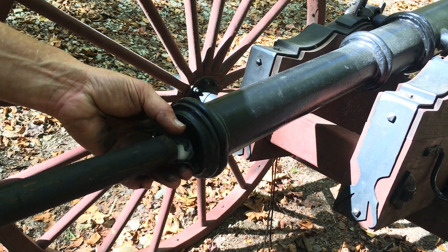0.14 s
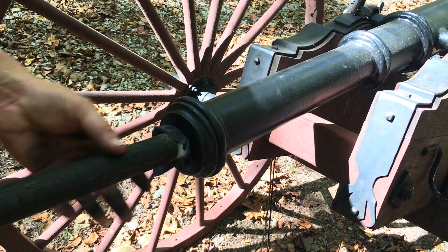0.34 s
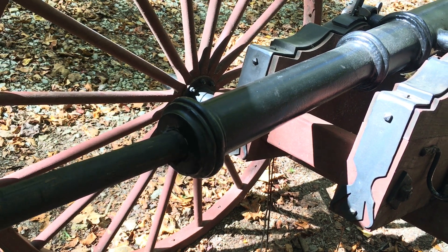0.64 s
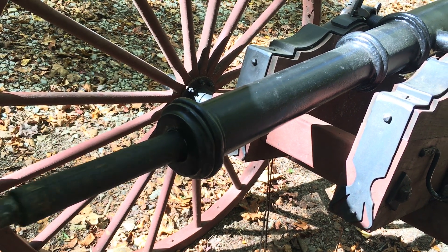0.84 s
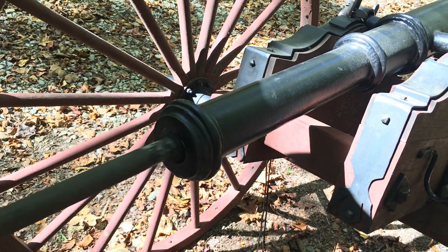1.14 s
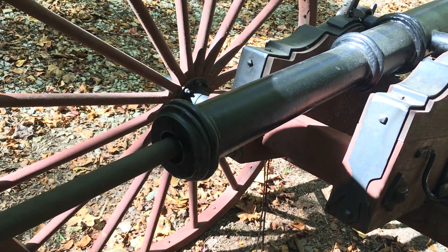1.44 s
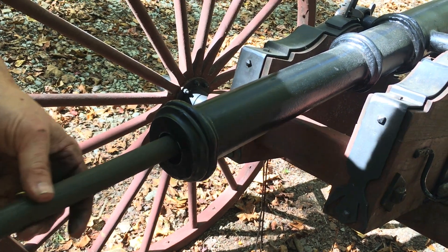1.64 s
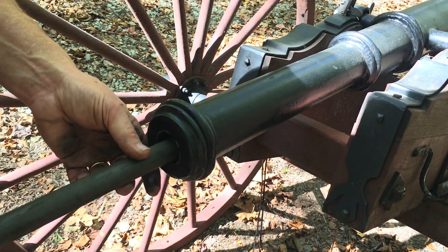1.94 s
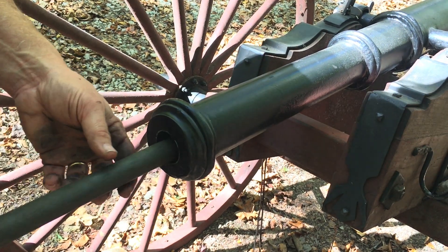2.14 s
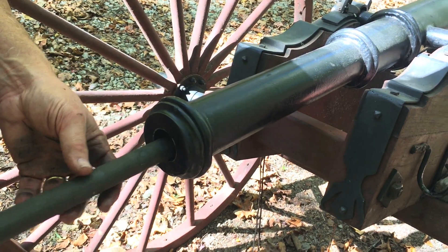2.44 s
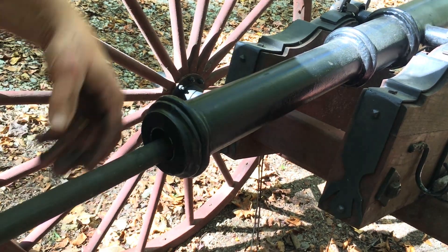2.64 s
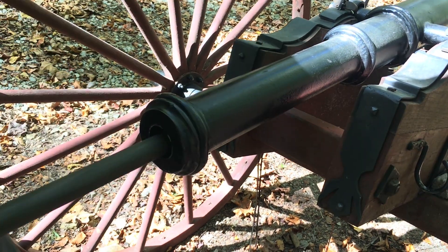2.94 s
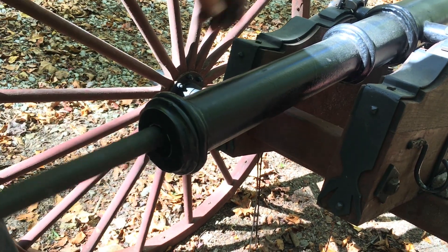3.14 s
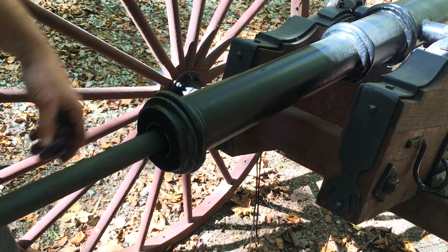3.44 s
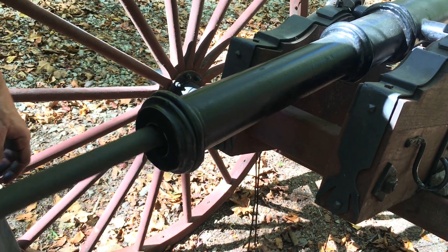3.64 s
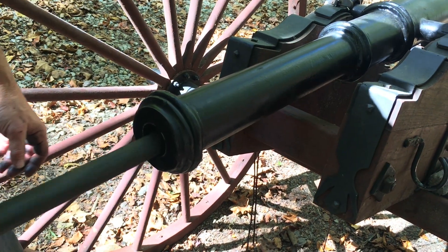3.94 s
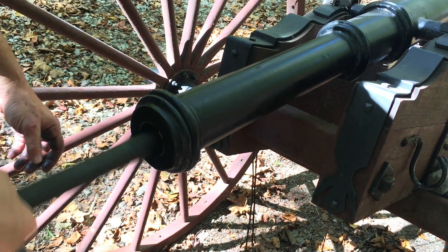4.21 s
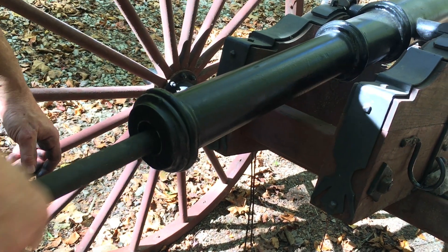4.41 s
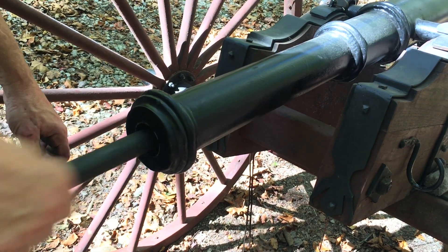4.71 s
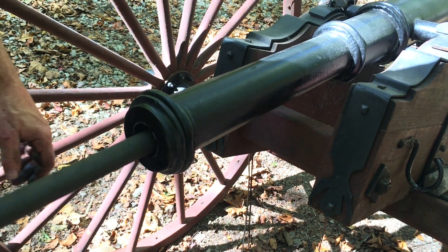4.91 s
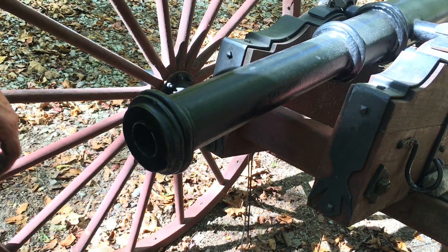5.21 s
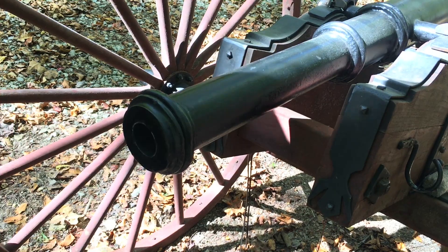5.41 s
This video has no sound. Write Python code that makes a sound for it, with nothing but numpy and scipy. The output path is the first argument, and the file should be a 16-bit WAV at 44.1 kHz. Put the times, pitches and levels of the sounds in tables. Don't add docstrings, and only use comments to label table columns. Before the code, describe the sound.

Outdoors, faint leaves, insects and soft wind lie under close, dry sound. Friction strokes swell and overlap as a rod goes down a metal bore, with brief groans and squeaks. Light fumbling taps lead to three very loud iron clanks, the last duller with a hard rebound knock. A pause, then rasping withdrawal, a soft low pop and small scuffs.

```python
import sys
import numpy as np
from scipy import signal
from scipy.fft import rfft, irfft
from scipy.io import wavfile
from scipy.ndimage import uniform_filter1d

SR = 44100
rng = np.random.default_rng(int(sys.argv[2]) if len(sys.argv) > 2 else 0)


def to_wav(s):
    ch = np.atleast_2d(s).T
    pcm = np.round(np.clip(ch, -1, 1) * 32767)
    wavfile.write(sys.argv[1], SR, pcm.astype(np.int16))


def boost(x):
    u = np.asarray(x, float) / 20
    return 10 ** u


N = 245479

EDGES_HZ = [90, 350, 2000, 6000, 16400]
# (time [s], peak level [dB], air column [dB], crack [dB], thud [dB])
BLOWS = [
    (3.2, -5, -12, -19.5, -25),
    (3.722, -5, -13.5, -22.5, -20),
    (4.219, -7.5, -8.5, -14, -17.5),
]


def evened(x):
    return x / np.sqrt(np.mean(x ** 2) + 1e-20)


def peaked(x):
    return x / np.max(abs(x))


def read(points, hz):
    f, value = np.transpose(points)
    return np.interp(np.log(hz + 1), np.log(f + 1), value)


def add(mix, s, sound):
    part = mix[round(s * SR):][:len(sound)]
    part += sound[:len(part)]


def resonate(x, hz, width):
    turn = np.exp(2j * np.pi * np.cumsum(hz * np.ones(len(x))) / SR)
    pole = np.exp(-np.pi * width / SR)
    return 2 * (turn * signal.lfilter([1 - pole], [1, -pole], x / turn)).real


def ring(modes, turns, alternate):
    t = np.arange(SR // 2) / SR
    out = np.zeros(len(t))
    for k, (hz, db, t60) in enumerate(modes):
        swell = 1 - np.exp(-t * hz / turns)
        out += (-1) ** (k * alternate) * boost(db - 60 * t / t60) * np.sin(2 * np.pi * hz * t) * swell
    return peaked(out)


def crack(t60, low_hz, high_hz):
    t = np.arange(4000) / SR
    band = signal.butter(2, [low_hz, high_hz], "band", fs=SR, output="sos")
    return peaked(signal.sosfilt(band, rng.standard_normal(len(t)) * boost(-60 * t / t60)))


def patchy(x, colour, patchy_db, frames, bins):
    hz, _, z = signal.stft(x, SR, nperseg=512, noverlap=384)
    patches = uniform_filter1d(rng.standard_normal(z.shape), round(bins), 0)
    patches = evened(uniform_filter1d(patches, round(frames), 1))
    gain = boost(read(colour, hz)[:, None] + patchy_db * patches)
    return signal.istft(z * gain, nperseg=512, noverlap=384)[1][:N]


def woods():
    # (frequency [Hz], density [dB per Hz])
    leaves = [(59, -30), (100, -1.5), (360, -7), (486, -12), (642, -10), (794, -14.5), (1870, -17.5),
              (4780, -24), (6870, -27), (7650, -32), (9270, -26.5), (14500, -32.5), (16500, -44.5)]
    # (time [s], half length [s], level [dB])
    low_swells = [(0.053, 0.026, -64), (0.337, 0.11, -68), (0.773, 0.088, -67), (1.07, 0.076, -69),
                  (1.448, .06, -74), (1.75, 0.087, -65.5), (2.24, .15, -63), (2.78, 0.028, -53),
                  (3.06, 0.067, -55), (3.62, 0.028, -56), (4.13, 0.033, -66), (4.45, 0.044, -64),
                  (5.008, 0.15, -67.5), (5.35, 0.049, -66.5)]
    insects_hz, wind_hz, breeze_db = 6850, 58, -67.5
    air = evened(patchy(rng.standard_normal(N), leaves, patchy_db=-0.5, frames=20, bins=3))
    insects = evened(resonate(resonate(rng.standard_normal(N), insects_hz, 500), insects_hz, 500))
    wind = evened(resonate(resonate(rng.standard_normal(N), wind_hz, 54), wind_hz, 54))
    t = np.arange(N) / SR
    strength = boost(breeze_db) + sum(boost(db) * np.exp(-((t - s) / half) ** 2) for s, half, db in low_swells)
    return boost(-66) * air + boost(-79) * insects + strength * wind


def stroke(t, fastest, rise, fall, start_db, end_db):
    roundness, stop_s = 1.3, .012
    before = np.clip((fastest - t) / rise, 0, 1)
    after = np.clip((t - fastest) / fall, 0, 1)
    edges = np.clip(np.minimum(t - fastest + rise, fastest + fall + stop_s - t) / stop_s, 0, 1)
    return (edges * boost(start_db * before ** roundness + end_db * after ** roundness)) ** 2


def rubbing():
    # (fastest at [s], speeding up [s], slowing down [s], rubbing level [dB], brightness [dB])
    pushes = [(.62, 0.17, 0.3, -76, 3), (.93, 0.25, 0.18, -61.5, -1), (1.16, 0.31, 0.18, -57, 6),
              (1.33, 0.32, 0.22, -54.5, -2), (1.62, 0.24, 0.12, -57, -1), (1.8, 0.21, 0.13, -55.5, 1),
              (1.95, 0.098, 0.029, -60.5, 5.5), (2.1, 0.094, 0.14, -56, -3.5),
              (2.245, 0.22, .075, -51.5, -5)]
    regrips = [(.42, 0.071, 0.044, -70, 8), (2.63, 0.12, .05, -57, 1), (5.13, 0.14, 0.049, -60.5, 5.5),
               (5.37, .08, 0.076, -56, 1.5), (5.497, 0.084, 0.0047, -53.5, 2.5)]
    nudges = [(2.725, 0.075, 0.054, -56, 3.5), (2.78, .06, 0.053, -51.5, 3),
              (2.87, 0.031, 0.059, -56.5, -0.5), (2.933, .012, 0.021, -51.5, -2.5),
              (3.005, 0.045, .07, -51, -2.5), (3.085, 0.037, 0.031, -56.5, 5)]
    settlings = [(2.33, 0.034, 0.12, -58.5, 5.5), (2.47, .08, 0.09, -70.5, 0), (4.48, 0.075, .17, -63.5, 0)]
    rams = [(3.17, 0.17, 0.022, -47.5, 2), (3.71, 0.096, 0.017, -40, -3.5), (4.2, 0.08, 0.024, -41.5, 0)]
    draws = [(3.37, .015, 0.014, -61.5, -1), (3.44, 0.06, 0.1, -54, -10.5), (3.55, 0.086, 0.054, -56, -1),
             (3.95, 0.084, 0.051, -52.5, 3.5), (4.02, 0.17, 0.061, -51, 1)]
    withdrawal = [(4.72, 0.05, 0.073, -60.5, -4), (4.79, 0.048, 0.025, -54, -8),
                  (4.85, 0.049, 0.044, -43.5, -8), (4.95, 0.094, 0.019, -49.5, 3.5),
                  (4.985, .04, 0.013, -46.5, 5.5), (5.036, 0.027, 0.028, -45.5, 7)]
    # (rows, start [dB], end [dB], carriage [dB], bore [dB], grit [dB])
    kinds = [(pushes, -16, -9.5, -7, 0, 0), (regrips, -16, -4, -13, -6.5, 0),
             (nudges, -3, -2.5, -7.5, -3.5, -1.6), (settlings, -8, -14.5, -12, -11, 0),
             (rams, -25, -4, -14, -3, -10.5), (draws, -21, -8, -11, -3, -6),
             (withdrawal, -14.5, -12, -13.5, -7, 0)]
    shudder_db = [-36.5, -49.5, -51, -64.5]
    shudder_t60 = [.35, 0.56, 0.37, .35]
    bore_dulling = 0.23
    rebound_db, rebound_s = -51.5, .035

    t = np.arange(0, N + 64, 64) / SR
    power = np.zeros((4, len(t)))
    for rows, start_db, end_db, carriage_db, bore_db, grit_db in kinds:
        for fastest, rise, fall, db, bright_db in rows:
            parts_db = np.array([carriage_db, bore_db - bore_dulling * bright_db, 0, grit_db + bright_db])
            share = boost(db + parts_db)
            power += share[:, None] ** 2 * stroke(t, fastest, rise, fall, start_db, end_db)
    for s, *_ in BLOWS:
        since = np.maximum(t - s, 0)
        power += (t > s) * boost(np.c_[shudder_db] - 60 * since / np.c_[shudder_t60]) ** 2
        power[3] += boost(rebound_db) ** 2 * stroke(t, s + .01, .01, rebound_s, 0, -4.5)
    return [np.interp(np.arange(N) / SR, t, np.sqrt(row)) for row in power]


def scrape():
    # (frequency [Hz], density [dB per Hz])
    rub_colour = [(60, -4), (165, 1.5), (480, -10.5), (1000, -5.5), (2400, -6), (2800, -7.5), (3600, -4),
                  (4400, -6), (5000, -11.5), (6000, -10), (7900, -12.5), (9300, -9.5), (10300, -14),
                  (12000, -11.5), (13300, -16.5), (16000, -17)]
    # (frequency [Hz], level against the rubbing [dB])
    rod_modes = [(620, -22), (1070, -22), (1570, -27.5), (2100, -25), (2500, -17.5)]
    hiss_top_hz, grains_per_s = 15900, 1500
    sizes = boost(4.0 * np.minimum(rng.exponential(1, N), 3.5))
    grit = sizes * (rng.random(N) < grains_per_s / SR) * rng.choice([-1, 1], N)
    slips = uniform_filter1d(uniform_filter1d(rng.standard_normal(N), size=350), size=350)
    rub = (rng.standard_normal(N) + 0.44 * evened(grit)) * boost(1.3 * evened(slips))
    z = rfft(patchy(rub, rub_colour, patchy_db=2.0, frames=18, bins=2.5))
    hz = np.fft.rfftfreq(N, 1 / SR)
    drive = rubbing()
    out = drive[2] * sum(boost(db) * evened(resonate(rub, f, 30)) for f, db in rod_modes)
    for low, high, gain in zip(EDGES_HZ, EDGES_HZ[1:], drive):
        band = 1 / np.sqrt((1 + (low / (hz + 1)) ** 12) * (1 + (hz / high) ** 12))
        out += evened(irfft(z * band * (hz < hiss_top_hz), N)) * gain
    return out


def spell(length, from_hz, to_hz, width, db):
    hz = np.linspace(from_hz, to_hz, round(length * SR))
    hiss = rng.standard_normal(SR)[:len(hz)]
    sung = evened(resonate(resonate(hiss, hz, width), hz, width))
    return boost(db) * sung * signal.windows.tukey(len(hz), .8)


def catches():
    # (time [s], length [s], frequency [Hz], width [Hz], level
    # [dB])
    songs = [(0.408, 0.04, 4450, 250, -66), (1.749, .03, 184, 40, -51.5), (1.856, 0.042, 169, 40.2, -47.5),
             (2.007, 0.011, 241, 200, -54.5), (2.247, 0.041, 1420, 200, -49.5),
             (2.307, 0.049, 116, 29.8, -47), (2.899, 0.043, 167, 100, -53.5), (3, 0.1, 5780, 200, -54.5),
             (3.047, 0.076, 333, 50, -56), (3.167, 0.056, 4350, 400, -48.5),
             (3.157, 0.049, 1950, 400, -48.5), (3.691, 0.046, 3900, 504, -44), (4.365, .06, 193, 150, -52),
             (4.798, 0.015, 1565, 79.4, -47), (4.86, 0.068, 2500, 80.5, -52), (4.865, 0.045, 638, 80, -59),
             (4.944, 0.033, 1580, 150, -49.5), (4.947, 0.063, 4130, 503, -46),
             (5.029, 0.058, 2500, 80, -52), (5.034, 0.026, 4600, 500, -45), (4.664, 0.06, 632, 80, -68),
             (5.045, 0.062, 1470, 297, -58), (5.355, 0.015, 3700, 298, -54),
             (5.399, 0.028, 2200, 200, -63.5)]
    # (from [s], to [s], from [Hz], to [Hz], level [dB])
    glides = [(0.82, 1.26, 1480, 1330, -64), (1.2, 1.4, 1140, 570, -64.5), (1.551, 1.94, 867, 640, -60.5),
              (1.547, 1.973, 1430, 1100, -60), (1.553, 1.92, 2130, 1900, -61.5),
              (0.951, 1.6, 3420, 3800, -59), (1.7, 2.06, 3400, 4070, -69), (0.74, 1.55, 7000, 5400, -66),
              (3.86, 4.09, 4650, 4260, -56), (2.075, 2.313, 1870, 1720, -60)]
    out = np.zeros(N)
    for s, length, hz, width, db in songs:
        add(out, s - length, spell(2 * length, hz, hz, width, db))
    for s, end, from_hz, to_hz, db in glides:
        add(out, s, spell(end - s, from_hz, to_hz, 40 + 0.063 * from_hz, db + 1.0))
    return out


def tick(peak_db, hz):
    snap = crack(0.0025, 2200, 15000)
    return boost(peak_db + 4.0) * peaked(0.28 * snap + resonate(snap, hz, 2500))


def contact(t60, share):
    click = np.pad([.5, 1, .5], (0, 3997))
    return click + share * crack(t60, 460, 7000)


def knock(body, peak_db, crack_db, t60, share):
    hit = contact(t60, share)
    rung = np.zeros(len(hit))
    for k, (hz, width, db) in enumerate(body):
        rung += (-1) ** k * boost(db) * resonate(hit, hz, 30 + 2 * width)
    sound = peaked(peaked(rung) + 0.51 * resonate(hit, 2300, 2500))
    return boost(peak_db) * (sound + boost(crack_db) * crack(.3 * t60, 4500, 11000))


def tap(peak_db, hz, t60):
    dull = resonate(resonate(contact(t60, 0.39), hz, 1.8 * hz), hz, 2.1 * hz)
    return boost(peak_db) * peaked(dull)


def blow(order, peak_db, column_db, crack_db, thud_db):
    # (frequency [Hz], t60 [s], level in blow 1 [dB], 2 [dB], 3 [dB])
    barrel = [(1066, 0.048, -14, -11.5, -11.5), (1195, .036, -5.5, -9, -10), (1441, .04, -3.5, -4, -6.5),
              (1636, .03, 0.5, -0.5, -3.5), (1754, .03, -9.5, -0.5, -7.5), (2005, 0.036, -4, 2, -4),
              (2200, 0.029, -7.5, -2.5, -8.5), (2500, 0.023, -17.5, -15.5, 0), (2746, .02, -19, -27, -2.5),
              (3120, 0.02, -30, -6.5, -7), (3495, 0.033, -16, -12, -14.5), (3686, 0.024, -13.5, 6.5, -23),
              (3835, .035, -9.5, -1.5, -17.5), (3900, 0.016, -21, 1.5, -20), (4056, 0.02, -1.5, -8.5, -17)]
    column_hz = [107, 287, 443, 590, 650, 872]
    air_column = list(zip(column_hz, [-1.5, 3.5, -3.0, -10.5, -0.5, -5.5],
                          [0.13, .065, .072, 0.074, 0.073, 0.063]))
    iron = [(hz, dbs[order], min(t60, .05)) for hz, t60, *dbs in barrel]
    out = ring(iron, turns=4.3, alternate=False)
    add(out, .0015, -boost(column_db + 3.5) * ring(air_column, turns=0.69, alternate=True)[:20000])
    add(out, 0, boost(crack_db + 12.0) * crack(0.0069, 2500, 6400) + boost(-21.5) * crack(0.025, 7000, 13500))
    add(out, 0, boost(-8.0) * crack(0.016, 1400, 2700) + boost(-23.0) * crack(0.082, 650, 6800))
    add(out, .002, boost(thud_db) * crack(0.098, 130, 215))
    add(out, .002, boost(-34) * np.hanning(500))
    return boost(peak_db + 4.5) * out


def pop():
    # (frequency [Hz], level [dB], t60 [s])
    open_bore = [(93, 0.5, 0.43), (294, -7.5, 0.32), (494, -17.5, 0.39), (670, -12.5, 0.27)]
    return boost(-39.5) * ring(open_bore, turns=0.66, alternate=True)


def scene():
    # (time [s], peak level [dB], centre [Hz])
    ticks = [(2.0985, -39, 3570), (2.4678, -33.5, 5620), (2.4933, -40, 5700), (2.5066, -44.5, 3040),
             (2.5152, -38, 5800), (2.786, -34, 11800), (2.853, -35.5, 6780), (2.869, -38, 5970),
             (3.001, -45, 5770), (3.2767, -41, 3500), (3.305, -51, 9000), (3.3647, -46.5, 5100),
             (3.374, -59, 6950), (3.431, -49, 8100), (3.462, -42, 7000), (3.511, -45, 7000),
             (3.582, -45.5, 8000), (3.812, -48, 4900), (3.4072, -46, 3980), (3.6476, -45, 4060),
             (3.7541, -35.5, 3730), (3.87, -50, 4630), (3.9883, -41, 4030), (4.299, -39, 4060),
             (4.4194, -43.5, 4310), (5.226, -58, 3180), (5.243, -49, 3700)]
    # (time [s], peak level [dB], crack [dB], rattle t60 [s], rattle share [1])
    knocks = [
        (2.65, -22.5, -34, 0.072, 0.38),
        (3.2639, -8, -21.5, 0.039, 0.2),
        (4.181, -19.5, -33.5, 0.065, 0.16),
        (4.2637, -2, -25, 0.039, 0.075),
        (4.403, -27, -24, 0.051, 0.18),
    ]
    # (frequency [Hz], width [Hz], level [dB])
    bodies = [
        [(189, 9.8, -4), (585, 14, -4), (787, 24, -3.5), (1117, 11, 0.5), (1856, 23, 0), (2130, 34, -5.5),
         (2490, 18, -7.5), (3160, 24, -14), (3450, 18, -11)],
        [(520, 130, -3.5), (1890, 110, 3), (2450, 73, -2), (3060, 190, -2), (4200, 250, -3), (4940, 120, -3),
         (6340, 280, -14.5)],
        [(404.5, 83, -10.5), (818, 33, -0.5), (1926, 91, -5), (2710, 100, -5), (3340, 810, -12.5)],
        [(1240, 62, -2), (1880, 100, -4.5), (2600, 210, -5), (3610, 51, -2.5), (4060, 74, -2.5),
         (6840, 290, -18.5)],
        [(584, 19, -3.5), (1160, 28, 4), (2030, 140, -13), (2530, 75, -11), (3740, 300, -19)],
    ]
    # (time [s], peak level [dB], centre [Hz], t60 [s])
    taps = [(2.719, -33, 2100, .02), (2.854, -32.5, 2270, 0.028), (2.891, -35, 1950, 0.07),
            (2.929, -31.5, 2900, 0.04), (3.193, -15, 1970, 0.025), (3.434, -34, 2500, 0.028),
            (3.517, -36, 1030, 0.16), (3.785, -24, 1670, 0.026), (3.796, -35, 3250, 0.03),
            (4.152, -36.5, 1590, .04), (4.292, -28, 1370, 0.018), (4.709, -40.5, 3530, 0.027),
            (4.829, -47, 3500, .06), (5.009, -33, 4200, 0.03)]
    out = woods() + scrape() + catches()
    for rows, source in ((ticks, tick), (taps, tap)):
        for s, *row in rows:
            add(out, s, source(*row))
    for body, (s, *row) in zip(bodies, knocks):
        add(out, s, knock(body, *row))
    for order, (s, *row) in enumerate(BLOWS):
        add(out, s, blow(order, *row))
    add(out, 5.057, pop())
    return out[None]


def roll_off(x):
    return signal.sosfilt(signal.butter(12, 16810, fs=SR, output="sos"), x)


def record(dry):
    soft = 0.66 * np.tanh(dry / 0.82)
    lowpass = signal.firwin(255, EDGES_HZ[-1], fs=SR)[None]
    return roll_off(signal.oaconvolve(soft, lowpass, "same"))


dry = scene()
out = record(dry)
to_wav(out)
```